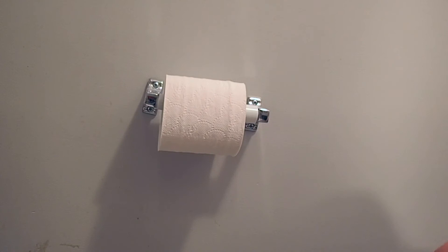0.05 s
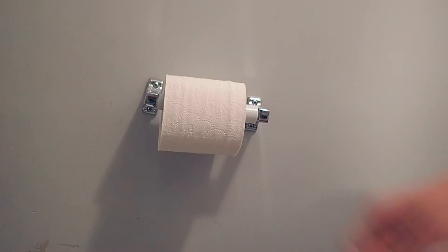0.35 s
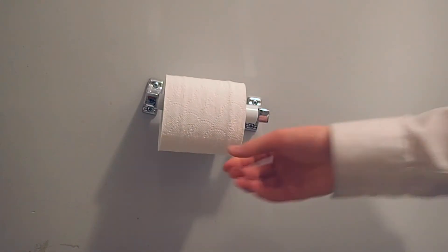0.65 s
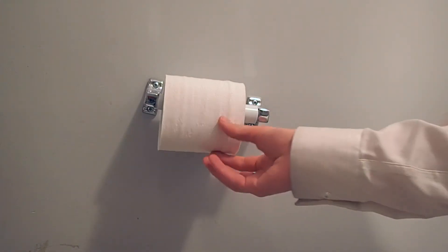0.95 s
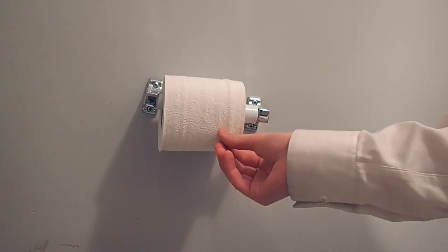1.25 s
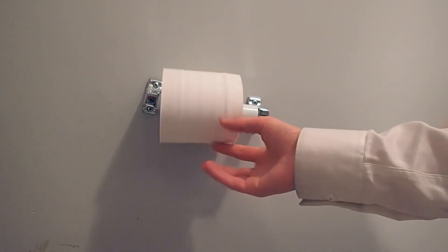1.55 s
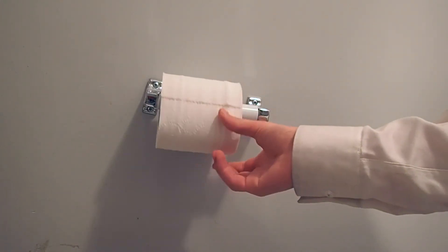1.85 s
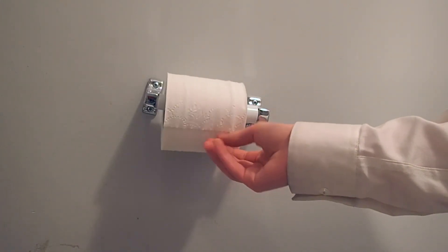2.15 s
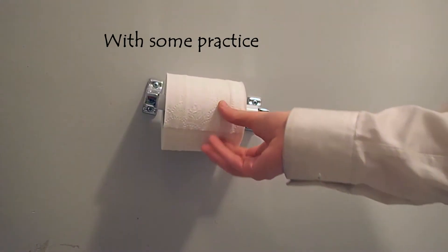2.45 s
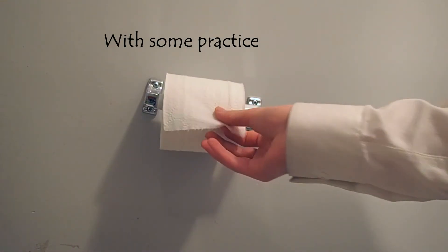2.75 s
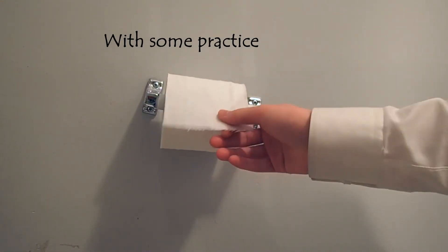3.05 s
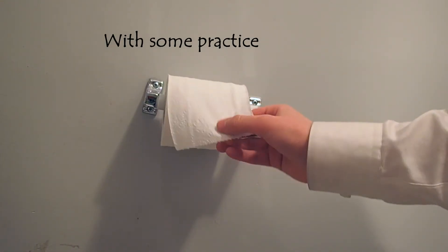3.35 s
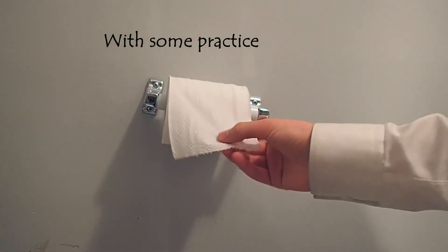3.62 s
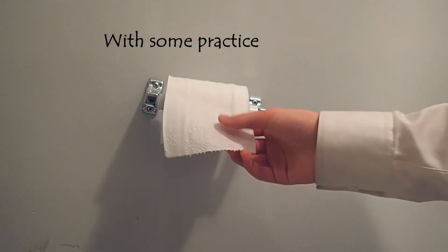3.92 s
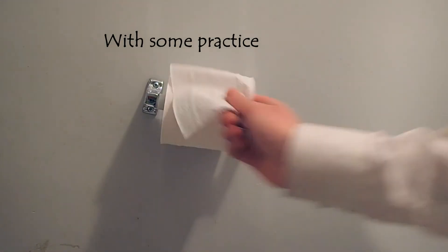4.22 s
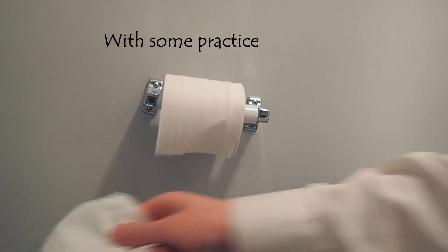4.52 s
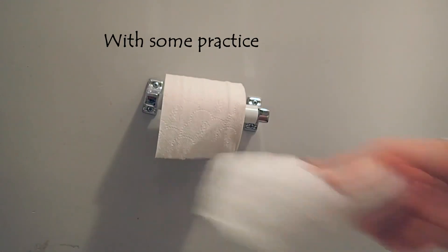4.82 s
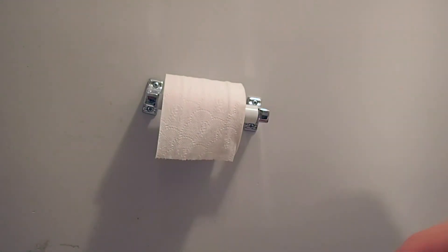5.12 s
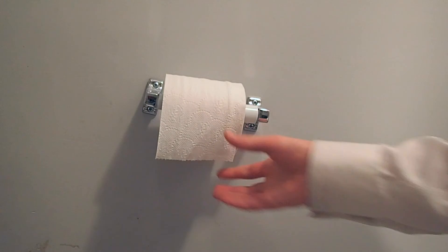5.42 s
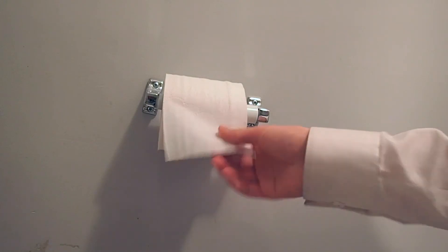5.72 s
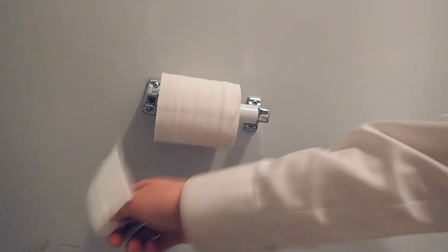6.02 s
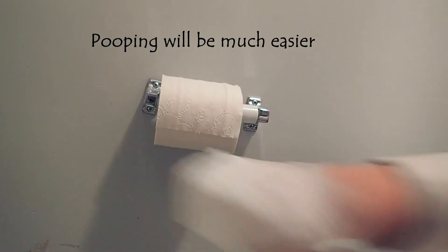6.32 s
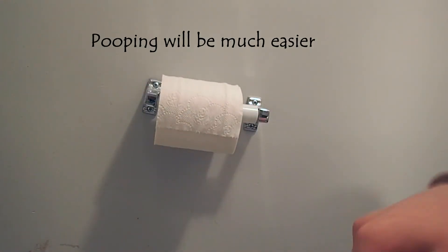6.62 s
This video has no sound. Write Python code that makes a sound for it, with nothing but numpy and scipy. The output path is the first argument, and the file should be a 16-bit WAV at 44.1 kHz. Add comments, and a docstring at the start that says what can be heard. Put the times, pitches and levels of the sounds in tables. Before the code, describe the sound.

Toilet paper rustles on its roll and is torn off twice in short, sharp rips, over a low fan hum.

```python
"""A small tiled room: a hand turns a toilet roll on its wall holder, finds the end, jerks off two sheets.
Each tear is a quick run of snapping perforations that drums on the sheet and the roll; the roll knocks
on its spindle. Paper and sleeve rustle in between, over the low hum of a ventilation fan.
A faint high whistle and a low tone come in about halfway."""
import sys
import numpy as np
from scipy import signal
from scipy.fft import rfft, irfft, next_fast_len
from scipy.io import wavfile

SR = 44100
rng = np.random.default_rng(int(sys.argv[2]) if len(sys.argv) > 2 else 0)


def generate_wav(signal):
    """Clip the signal to [-1, 1] and save it as 16-bit WAV at the path in sys.argv[1]."""
    frames = np.transpose(np.atleast_2d(signal))
    scaled = np.clip(frames, -1, 1) * 32767
    pcm = np.round(scaled).astype(np.int16)
    wavfile.write(sys.argv[1], SR, pcm)


N = 298557
TIME = np.arange(N) / SR
STRAIN_S = 0.016  # the paper strains this long before it gives

# Sheets torn off: t/s, length/s, crack/dB, snaps/dB, fade over the run/dB,
# taut sheet/dB, taut f/Hz, slack sheet/dB, slack f/Hz, thump/dB, kick/dB
TEARS = [(4.3922, 0.041, -22, -24.5, -7.5, -27.5, 930, -27, 580, -36.5, 4),
         (6.035, 0.042, -19.5, -23.5, -9, -20, 1074, -24, 637, -39, 5)]
def tears(kick_delay_s=0.015):
    """Each jerk snaps the paper and pushes on the roll, which kicks and rings early in the tear."""
    snaps, push, kick = np.zeros((3, N))
    for start, *settings, kick_db in TEARS:
        clicks, sheet = perforation_run(*settings)
        add(snaps, start - STRAIN_S, clicks)
        add(push, start - STRAIN_S, sheet)
        add(kick, start + kick_delay_s, amp([kick_db]))
    return snaps, push, kick


def perforation_run(length, crack_db, snap_db, fade_db, taut_db, taut_hz, slack_db, slack_hz, thump_db,
                    strain_db=-12, release_s=0.012, crack_decay_s=0.0028, bridges_per_s=520):
    """A crack, then the perforations snap in a run; the sheet drums high while taut, low once slack."""
    t = np.arange(SR // 5) / SR - STRAIN_S
    release = np.exp(-np.maximum(t - length, 0) / release_s)
    pull = np.where(t < 0, amp(strain_db) * (1 + t / STRAIN_S), release)
    progress = np.clip(t / length, 0, 1)
    tension = pull * amp(fade_db * progress)
    # the paper bridges between the holes break at uneven intervals, with much the same strength
    break_times = np.cumsum(rng.uniform(.3, 1.7, size=200)) / bridges_per_s
    strength = rng.choice([-1, 1], len(t)) * rng.uniform(.5, 1.5, len(t))
    bridges = unit(np.diff(np.searchsorted(break_times, t), prepend=0) * strength)
    snaps = unit(bridges + amp(-6) * grains(len(t), per_s=3700, spread_db=1))
    crack_envelope = amp(crack_db) * (t >= 0) * np.exp(-abs(t) / crack_decay_s)
    crack = crack_envelope * grains(len(t), per_s=4700, spread_db=1.5)
    taut = amp(taut_db) * drum(snaps, taut_hz, width_hz=620, force=tension * np.sqrt(pull))
    slack = amp(slack_db) * drum(snaps, slack_hz, width_hz=600, force=pull * np.sqrt(progress))
    thump = amp(thump_db) * drum(snaps, hz=250, width_hz=240, force=pull)  # the jerked sheet pushes a low puff of air
    return crack + amp(snap_db) * tension * snaps, taut + slack + thump


# Knocks on the spindle: t/s, length/s, scuff/dB, thud/dB, thud f/Hz, thud width/Hz
KNOCKS = [(1.064, 0.044, -47, -47, 500, 900), (1.695, 0.025, -36, -30, 1020, 504),
          (1.703, 0.03, -34, -35.5, 307, 450), (4.6357, 0.029, -41, -34.5, 343, 786),
          (6.327, 0.024, -35, -40.5, 317, 650)]
def knocks():
    """The roll bumps its spindle with a thud and scuffs to rest."""
    scuffs, thuds = np.zeros((2, N))
    t = np.arange(SR // 5) / SR
    for start, length, scuff_db, thud_db, hz, width_hz in KNOCKS:
        contact = np.exp(-(t / length) ** 2)
        clicks = grains(len(t), per_s=2400, spread_db=.5)
        add(scuffs, start, amp(scuff_db) * contact * clicks)
        add(thuds, start, amp(thud_db) * drum(clicks, hz, width_hz, contact))
    return scuffs, thuds


# Crease flicks: t/s, level/dB
CREASES = [(4.339, -41.5), (5.006, -47.5), (5.3705, -53), (6.5247, -53)]
def creases(decay_s=0.028):
    """Single creases flick over, each a short crackle."""
    flicks = np.zeros(N)
    t = np.arange(SR // 20) / SR
    for start, db in CREASES:
        add(flicks, start, amp(db) * np.exp(-t / decay_s) * grains(len(t), per_s=4500, spread_db=-1))
    return flicks


# Resonances of roll, tube and holder: f/Hz, width/Hz, level/dB
ROLL_MODES = [(173, 45, -5), (247.2, 11.7, 13), (437, 13, -6), (481, 20, 12), (487, 18, -2), (675, 9.6, 3),
              (780, 30, 0), (924, 35, 3), (1110, 15, -11), (1300, 20, -1)]
def roll_body(push, kick, body_db=-4, ring_db=-9, low_cut_hz=120):
    """Pushes sound as dull thuds; they and the kick set the roll and holder ringing."""
    drive = kick + amp(ring_db) * push
    ring = sum(amp(db) * resonate(drive, hz, width) for hz, width, db in ROLL_MODES)
    low_cut = signal.butter(2, low_cut_hz, "high", fs=SR, output="sos")
    return signal.sosfilt(low_cut, amp(body_db) * push + ring)


# Tone of the paper snaps and of the scuffs: f/Hz, level/dB
SNAP_EQ = [(100, -20), (400, 6), (1200, 7.5), (2100, 2.5), (3000, -0.5), (4500, -1.5), (6000, -1.5),
           (8000, -1.5), (10000, -6), (14000, -7), (16000, -5)]
SCUFF_EQ = [(100, 1.5), (400, 8.5), (1200, 7), (2100, 2.5), (3000, -1), (5000, -1.5), (6500, -3.5),
            (8000, -8.5), (10000, -12), (15000, -6)]
def handling(snap_db=3, scuff_db=3):
    """Tears, knocks and creases: sharp paper transients on top of the body of the roll."""
    snaps, push, kick = tears()
    scuffs, thuds = knocks()
    snaps = tint(snaps + creases(), lambda hz: read(SNAP_EQ, hz))
    scuffs = tint(scuffs, lambda hz: read(SCUFF_EQ, hz))
    return roll_body(push + thuds, kick) + amp(snap_db) * snaps + amp(scuff_db) * scuffs


# Finger drags over the roll: t/s, length/s, rasp/dB, paper hiss/dB
DRAGS = [(1.068, 0.19, -54.5, -52), (1.216, 0.13, -45.5, -43.5), (2.545, 0.19, -49, -46.5),
         (2.691, 0.25, -52, -47), (3.878, 0.075, -52.5, -60)]
# Tone of the rasp: f/Hz, level/dB
RASP_EQ = [(100, -21), (600, -16), (830, 7.5), (1050, 5.5), (1300, -6), (2200, -7.5), (4000, -34),
           (15000, -46)]
def finger_drags(grip_s=0.031, rasp_gain_db=2):
    """Fingers grip fast and ease off: a hollow rasp, plus a power envelope for the paper hiss."""
    pressure, hiss_power = np.zeros((2, N))
    for start, length, rasp_db, hiss_db in DRAGS:
        grip = (TIME - start) / grip_s
        let_go = (start + length - TIME) / max(length - grip_s, grip_s)
        stroke = np.clip(np.minimum(grip, let_go), 0, 1)
        pressure += amp(rasp_db) * stroke
        hiss_power += (amp(hiss_db) * stroke) ** 2
    rasp = tint(grains(N, per_s=2400, spread_db=4.5), lambda hz: read(RASP_EQ, hz))
    return amp(rasp_gain_db) * pressure * unit(in_room(rasp)), hiss_power


# Slides of the loose sheet or sleeve, one per hand movement: middle t/s, length/s, level/dB
SLIDES = [(0.123, 0.14, -56), (0.4, 0.18, -53.5), (1.395, 0.15, -64), (1.64, 0.19, -53),
          (1.894, 0.24, -55.5), (2.157, 0.29, -54.5), (2.49, 0.098, -58), (2.917, .1, -52),
          (3.073, 0.27, -53.5), (3.457, .26, -55), (3.65, 0.32, -55), (3.87, 0.25, -53.5),
          (4.185, 0.49, -57.5), (4.385, 0.051, -42.5), (4.57, 0.1, -48), (4.674, 0.26, -55.5),
          (4.977, 0.8, -56.5), (5.274, 0.18, -52.5), (5.871, 0.13, -49.5), (5.943, 0.13, -52),
          (6.034, 0.056, -41), (6.24, 0.23, -52.5), (6.53, 0.33, -55.5)]
# Tone of the sliding: f/Hz, level/dB
SLIDE_EQ = [(100, -39), (400, 2.5), (1200, 0.5), (2500, -4), (5200, -0.5), (6800, 0.5), (8200, -1),
            (9500, -5), (15000, -3)]
def rustle(sleeve_db=-64.5, wander_db=2.5):
    """Fine fibre clicks swell as paper and sleeve slide; the fingers add their rasp."""
    fibres = tint(grains(N, per_s=2500, spread_db=3.5), lambda hz: read(SLIDE_EQ, hz))
    rasp, hiss_power = finger_drags()
    hiss_power += amp(sleeve_db + wander_db * wander(top_hz=5)) ** 2  # the arm is never quite still
    for middle, length, db in SLIDES:
        hand_speed = np.maximum(1 - (2 * (TIME - middle) / length) ** 2, 0)
        hiss_power += (amp(db) * hand_speed) ** 2
    return np.sqrt(hiss_power) * unit(in_room(fibres)) + rasp


# Fan and mains hum: f/Hz, rms level/dB
HUM_LINES = [(78.9, -37.5), (110.9, -70), (120, -81), (223.2, -68.5), (249.6, -62.5)]
# Bed of fan air and microphone hiss: f/Hz, density/dB per Hz
AIR_BED = [(25, -81.5), (55, -81), (72, -58), (88, -61.5), (115, -69.5), (190, -72.5), (240, -74),
           (290, -74), (500, -79), (1000, -83.5), (2200, -92.5), (5500, -101), (8000, -93.5), (15000, -89)]
# Stereo image of the bed: f/Hz, left-right likeness/0-1
AIR_LIKENESS = [(30, 1), (80, 1), (130, 0.39), (290, 0.18), (700, 0.17), (1500, 0.091), (7000, 0),
                (15000, 0)]
def fan():
    """Steady motor lines in a bed of duct rumble and hiss."""
    white = pair(rng.standard_normal((2, N)), AIR_LIKENESS)
    density = amp(read(AIR_BED, np.fft.rfftfreq(N, 1 / SR)))
    air = irfft(rfft(white) * density, N) * np.sqrt(SR / 2)
    return air + sum(np.sqrt(2) * amp(db) * sine(hz) for hz, db in HUM_LINES)


def whine(start_s=3.55, rise_s=0.22, hz=7564, width_hz=45, whistle_db=-67, drone_hz=341, drone_db=-58):
    """A faint, fuzzy high whistle and a low tone fade in together and stay."""
    whistle = np.array([unit(band(noise, hz, width_hz)) for noise in rng.standard_normal((2, N))])
    drone = np.sqrt(2) * np.sin(2 * np.pi * drone_hz * TIME)
    fade_in = np.clip((TIME - start_s) / rise_s, 0, 1)
    return fade_in * (amp(whistle_db) * whistle + amp(drone_db) * drone)


# Reverb time of the tiled room: f/Hz, t60/s
ROOM_DECAY = [(100, 0.33), (500, 0.39), (1200, 0.32), (3000, 0.31), (6000, 0.34), (10000, 0.22),
              (16000, 0.23)]
def reflections(early_db=-4, early_decay_s=0.0088, early_per_s=2500, late_per_s=5000):
    """A quick cluster off the close walls, then the ring of the room."""
    t = np.arange(SR * 3 // 4) / SR
    echoes = rng.choice([-1, 1], (2, len(t))) * (rng.random((2, len(t))) < late_per_s / SR)
    hz, age, spectra = signal.stft(echoes, SR, nperseg=256)
    decay = amp(-60 * age / read(ROOM_DECAY, hz)[:, None])
    tail = signal.istft(spectra * decay, SR)[1][:, :len(t)]
    early = rng.standard_normal(tail.shape) * np.exp(-t / early_decay_s)
    early *= rng.random(tail.shape) < early_per_s / SR
    return unit(unit(tail) + amp(early_db) * unit(early)) / np.sqrt(len(t))


# Stereo image of close sounds: f/Hz, left-right likeness/0-1
NEAR_LIKENESS = [(60, 1), (200, 1), (700, 0.98), (2400, 1), (4400, 0.9), (8000, 0), (14000, 0)]
def in_room(x, direct_db=-4, move_hz=9, sets=3):
    """Plays a sound in the room; as the paper moves, it crossfades between sets of reflections."""
    heard = np.zeros((2, N))
    for k in range(sets):
        share = np.sqrt(2 / sets) * np.cos(2 * np.pi * (move_hz * TIME + k / sets))
        heard += signal.oaconvolve((x * share)[None], reflections(), axes=1)[:, :N]
    heard[0] += amp(direct_db) * x
    return pair(heard, NEAR_LIKENESS) / np.hypot(1, amp(direct_db))


def pair(two, likeness):
    """Blends two unrelated signals, as mid and side, into what two close microphone ports hear."""
    size = next_fast_len(N, True)
    a, b = rfft(two, size)
    same = np.clip(read(likeness, np.fft.rfftfreq(size, 1 / SR)), -1, 1)
    mid, side = a * np.sqrt((1 + same) / 2), b * np.sqrt((1 - same) / 2)
    return irfft(np.array([mid + side, mid - side]), size)[:, :N]


def grains(size, per_s, spread_db):
    """Random fibre clicks of uneven strength."""
    strength = amp(spread_db * np.minimum(rng.exponential(1, size), 4))
    return unit(strength * rng.choice([-1, 1], size) * (rng.random(size) < per_s / SR))


def drum(clicks, hz, width_hz, force):
    """Clicks sound a broad, damped resonance, as loud as the force on it."""
    return unit(force * band(clicks, hz, width_hz)) * np.sqrt(np.mean(force ** 2))


def band(x, hz, width_hz):
    """Two like resonances in series."""
    return resonate(resonate(x, hz, width_hz), hz, width_hz)


def resonate(x, hz, width_hz):
    """A resonance of gain 1."""
    turn = np.exp(2j * np.pi * np.cumsum(np.full(len(x), hz)) / SR)
    pole = np.exp(-np.pi * width_hz / SR)
    return 2 * (turn * signal.lfilter([1 - pole], [1, -pole], x / turn + 1e-18)).real


def tint(x, db_at, size=4096):
    """Minimum-phase EQ with the gain curve db_at(Hz)."""
    log_gain = np.log(amp(db_at(abs(np.fft.fftfreq(size, 1 / SR)))))
    taps = np.fft.ifft(np.exp(np.conj(signal.hilbert(log_gain)))).real[:size // 2]
    return signal.oaconvolve(x, taps)[:len(x)]


def wander(top_hz):
    """A slow random drift of rms 1."""
    return unit(sum(sine(hz) for hz in np.geomspace(top_hz / 10, top_hz, 16)))


def sine(hz):
    """A steady sine at a random phase."""
    return np.sin(2 * np.pi * (hz * TIME + rng.random()))


def amp(db):
    """Decibels to gain."""
    return 10 ** (np.asarray(db) / 20)


def unit(x):
    """Scales to rms 1."""
    return x / np.sqrt(np.mean(x ** 2) + 1e-20)


def read(points, hz):
    """Reads a table on a log-frequency axis."""
    f, value = np.transpose(points)
    return np.interp(np.log(hz + 1), np.log(f + 1), value)


def add(mix, start_s, sound):
    """Mixes a sound in at its cue."""
    part = mix[max(round(start_s * SR), 0):][:len(sound)]
    part += sound[:len(part)]


def scene():
    """Paper sounds in the room, over the fan and the whine."""
    return in_room(handling()) + rustle() + fan() + whine()


# Microphone colour: f/Hz, level/dB
MIC_EQ = [(100, -0.5), (1350, -0.5), (1700, -0.5), (2150, -1.5), (2600, -8), (3000, -3), (3950, -7.5),
          (4550, 0.5), (5300, 10), (6900, 4), (8100, 5), (9300, -2.5), (11000, -4.5), (15500, -8)]
# Notches of its port: f/Hz, width/Hz, level/dB
PORT_NOTCHES = [(1876, 122, -7), (3400, 65, -12.5), (4094, 240, -5.5), (4854, 156, -5)]
def microphone_db(hz):
    """The small microphone port scoops the upper mids and rings above them."""
    notches = sum(db * np.exp(-((hz - centre) / width) ** 2) for centre, width, db in PORT_NOTCHES)
    return read(MIC_EQ, hz) + notches


# Stereo balance: f/Hz, left minus right level/dB
BALANCE = [(60, -1), (200, -1.5), (700, -.6), (2400, -.1), (5000, -.8), (8000, -2), (14000, -1.4)]
def record(dry):
    """Microphone colour, a slightly stronger right side, and a steep high cut."""
    left = tint(dry[0], lambda hz: microphone_db(hz) + read(BALANCE, hz) / 2)
    right = tint(dry[1], lambda hz: microphone_db(hz) - read(BALANCE, hz) / 2)
    high_cut = signal.firwin(1401, cutoff=15780, window=("kaiser", 9), fs=SR)
    return signal.oaconvolve(np.array([left, right]), high_cut[None], "same")


dry = scene()
out = record(dry)
generate_wav(out)
```